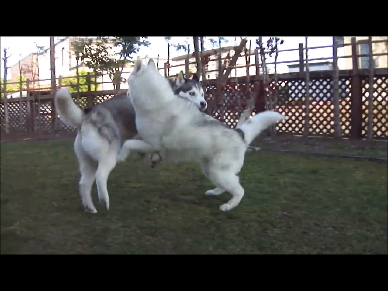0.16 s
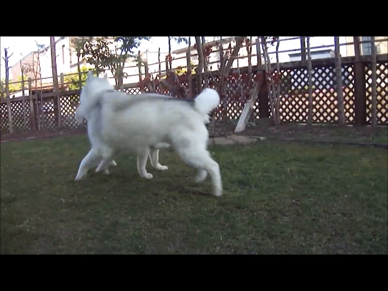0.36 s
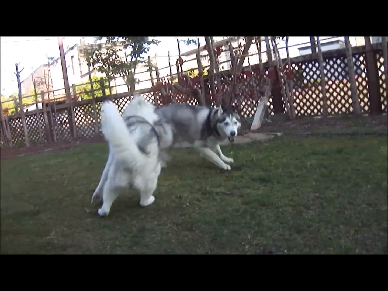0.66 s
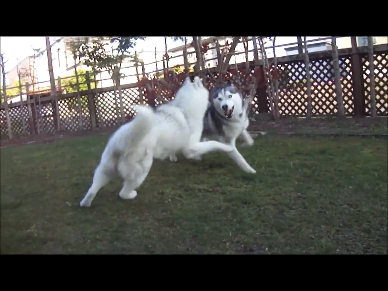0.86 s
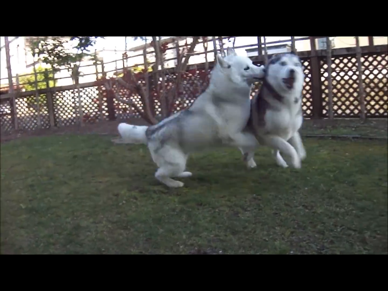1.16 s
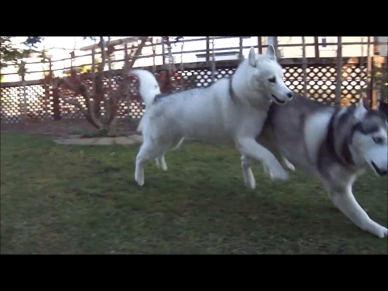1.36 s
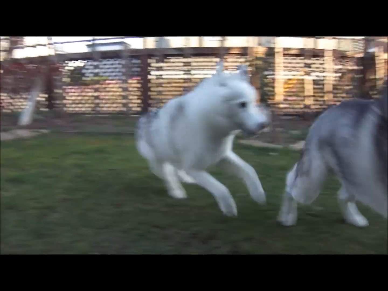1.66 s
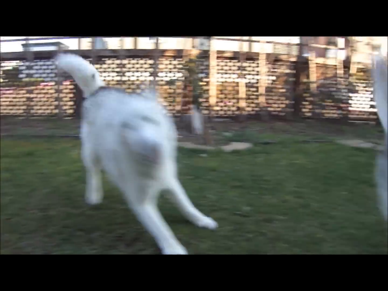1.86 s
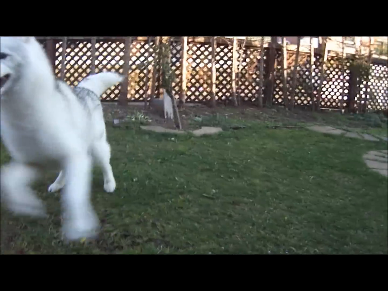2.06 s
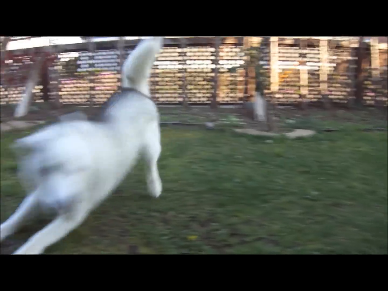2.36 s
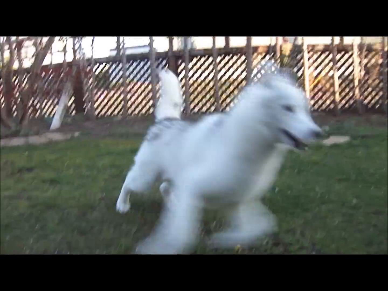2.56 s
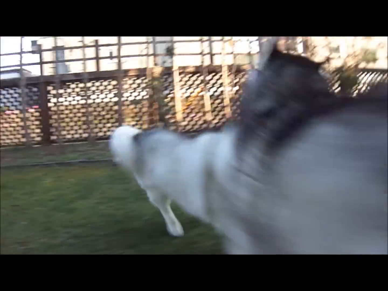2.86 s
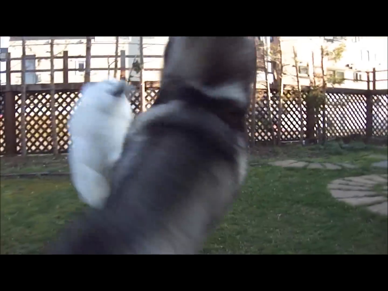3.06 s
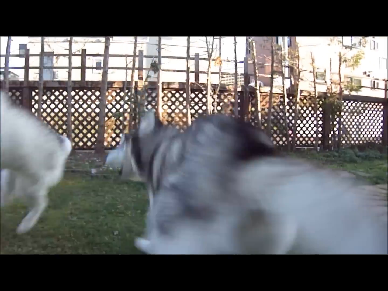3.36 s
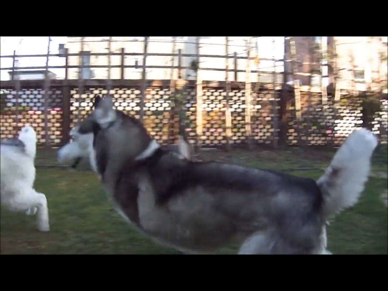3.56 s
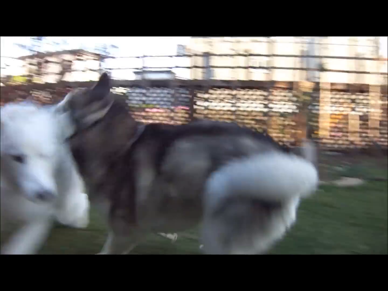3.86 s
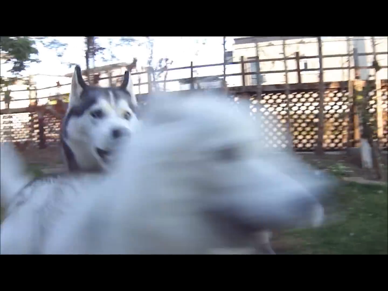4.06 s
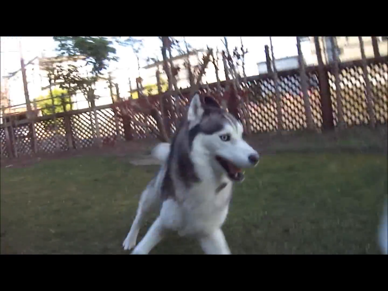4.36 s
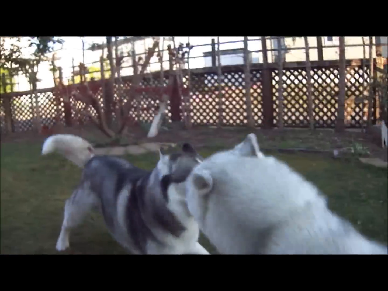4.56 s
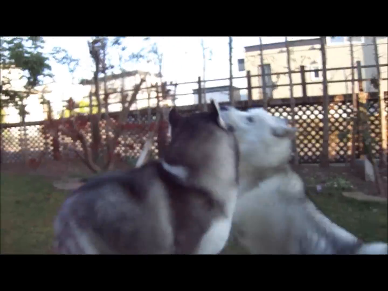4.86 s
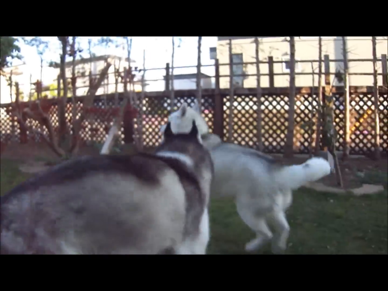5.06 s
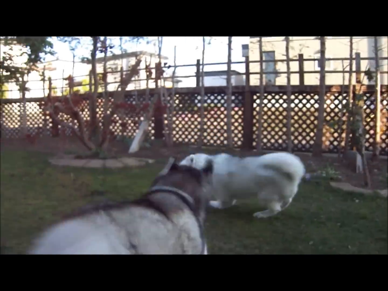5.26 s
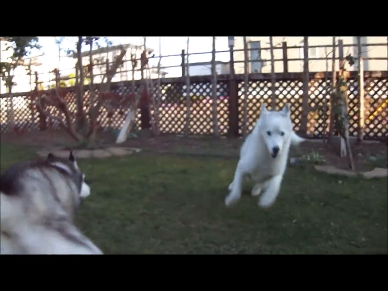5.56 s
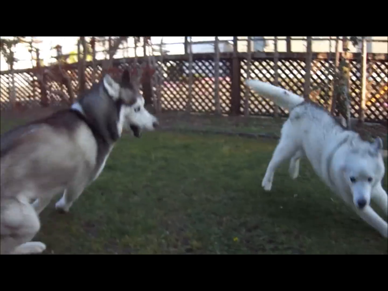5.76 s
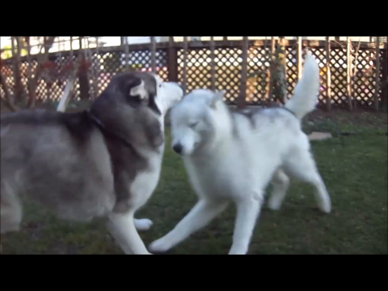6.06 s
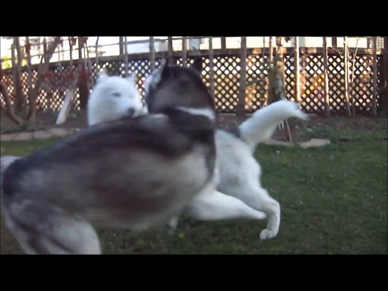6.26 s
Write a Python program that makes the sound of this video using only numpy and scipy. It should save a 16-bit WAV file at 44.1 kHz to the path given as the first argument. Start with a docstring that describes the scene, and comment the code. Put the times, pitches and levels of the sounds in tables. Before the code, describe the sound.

Two large dogs wrestle and chase close to a small camera microphone in an open garden. Soft huffs and a grumble come first over a faint fading engine hum, then a loud burst of yips, snarls and barks, quieter growls and pants, a hoarse yowl, and a last run of grunts, yelps and wheezes. Paws thump on turf, grass swishes and twigs snap.

```python
"""A garden lawn with a wooden fence: two dogs play-fight and chase each other close to the listener.
Rasping air through throat and jaw resonances makes huffs, pants and snarls; hoarse tones make the yips.
Every call swells to a crest and fades. Paws are decaying slaps and thuds, stalks crack in noise bursts,
and grass is a rain of coloured ticks. Ground and fence throw a little back as dull echoes.
Underneath lie the shaped noise of a distant town and, at first, the wavering hum of a far engine."""
import sys
import numpy as np
from scipy import signal
from scipy.io import wavfile
from scipy.ndimage import uniform_filter1d, map_coordinates

SR = 44100
rng = np.random.default_rng(int(sys.argv[2]) if len(sys.argv) > 2 else 0)


def transcribe(signal):
    """Save signal, clipped to [-1, 1], as a 16-bit WAV file at the path in sys.argv[1]."""
    frames = np.atleast_2d(signal).T
    limited = np.clip(frames, -1, 1)
    pcm = np.round(limited * 32767).astype(np.int16)
    wavfile.write(sys.argv[1], SR, pcm)


N = 283122
TIME = np.arange(N) / SR

# hush of the distant town, relative spectrum: [f/Hz, level/dB per Hz]
TOWN_SPECTRUM = [(30, -15), (60, -8), (140, -5.5), (350, 1.5), (600, 0), (1030, 4.5), (2400, -6),
                 (5000, -24), (11000, -23)]
# partials of the far engine, before its fade and wavering: [f/Hz, level/dB]
ENGINE_PARTIALS = [(102.3, -54.5), (150.7, -49.5)]
# rise and fall of the engine hum: [t/s, gain/dB]
ENGINE_FADE_CURVE = [(0, -8.5), (1.0, 1), (2.2, -18.5), (3.2, -29)]
# relative spectrum of rustling grass: [f/Hz, level/dB per Hz]
RUSTLE_SPECTRUM = [(500, 5.5), (1500, 2.5), (3000, 10), (5500, 5), (6800, 3.5), (11000, -5)]
# paws skidding through grass and fur brushing past: [start t/s, length t/s, level/dB]
GRASS_SWISHES = [(0.062, 0.057, -47.5), (0.19, 0.071, -51), (1.877, .13, -44.5), (2.737, 0.2, -46.5),
                 (3.905, .127, -40), (4.229, 0.15, -32), (5.84, .246, -41), (6.18, 0.17, -35.5)]
# echoes off ground and fence: [delay t/s, level/dB]
ECHOES = [(.009, -19.5), (.027, -18), (0.052, -27)]
# the dogs' calls; the moving jaw bends the mouth resonance:
# [start t/s, length t/s, crest level/dB, crest place 0-1, mouth resonance f/Hz, shape name]
CALLS = [(0.278, 0.25, -39, 0.35, 1060, "wheeze"), (0.624, 0.16, -30, 0.3, 1170, "pant"),
         (0.87, 0.062, -36.5, 0.74, 1360, "pant"), (1.141, 0.28, -29.5, 0.36, 900, "grumble"),
         (1.48, .16, -15, 0.54, 936, "yip"), (1.643, 0.089, -15, 0.51, 1056, "snarl"),
         (1.726, .08, -25, 0.24, 1000, "yelp"), (1.92, 0.16, -15.5, 0.12, 1156, "bark"),
         (2.129, 0.13, -29.5, 0.46, 1220, "pant"), (2.303, 0.12, -16, 0.31, 1170, "bark"),
         (2.415, 0.17, -14.5, 0.33, 1086, "screech"), (2.805, 0.09, -31.5, 0.34, 1020, "wheeze"),
         (2.887, 0.21, -22.5, .2, 1170, "growl"), (3.068, 0.15, -31, 0.28, 1064, "growl"),
         (3.395, 0.15, -30, 0.18, 1020, "pant"), (3.496, .165, -23, .55, 947, "yelp"),
         (3.659, .14, -27, 0.67, 1063, "wheeze"), (3.933, 0.091, -33.5, 0.42, 780, "pant"),
         (4.1, .1, -38, .45, 975, "grumble"), (4.242, .225, -15.5, .58, 1116, "yowl"),
         (4.46, 0.18, -25.5, 0.17, 1120, "wheeze"), (4.698, 0.079, -33, 0.14, 1200, "pant"),
         (4.81, .1, -22.5, .5, 970, "roar"), (4.993, 0.05, -30.5, 0.6, 1020, "wheeze"),
         (5.126, 0.32, -23.5, .72, 974, "wheeze"), (5.382, .1, -21.5, 0.4, 1100, "grunt"),
         (5.512, 0.19, -21, 0.34, 1008, "yelp"), (5.736, .22, -22, 0.73, 1100, "wheeze"),
         (5.939, 0.15, -15.5, 0.44, 986, "roar"), (6.206, 0.11, -31, 0.62, 1295, "grumble")]
# throat and mouth shapes by name, levels relative to the mouth resonance (throat() lifts the chest):
# [chest level/dB, pharynx f/Hz, pharynx level/dB, mouth width f/Hz,
#  muzzle f/Hz, muzzle level/dB, teeth f/Hz, teeth level/dB]
MOUTH_SHAPES = {"pant": (-10, 492, -9.5, 602, 1532, -12.5, 2364, -9),
                "grumble": (1.5, 576, -2.5, 273, 1446, -6.5, 2350, -13.5),
                "yip": (-17.5, 727, -17.5, 178, 1810.5, -11, 3298, -21.5),
                "snarl": (-16.5, 748, -7, 167, 1494, -8.5, 2409, -12),
                "bark": (-21.5, 624, -5, 497, 1789, -17, 2299, -17),
                "screech": (-18.5, 593, -19.5, 262, 1563, -11, 2555, -12),
                "growl": (0.5, 516, -6.5, 549, 2094, -5.5, 2484, -7),
                "yelp": (-13.5, 703, -11.5, 129, 1810, -10.5, 2580, -15.5),
                "yowl": (-18, 537, -11.5, 450, 1520, -14, 2368, -14),
                "wheeze": (-10, 654, -20, 489, 1814, -17, 2500, -15),
                "grunt": (4, 415, 15, 356, 1514, 5, 2600, -3),
                "roar": (-6, 527, -9, 219, 1635, -6, 2268, -7)}
# the vocal folds catch and squeal: [start t/s, end t/s, first pitch f/Hz, last pitch f/Hz, voiced share 0-1]
FOLD_SQUEALS = [(1.456, 1.63, 896, 988, 0.67), (2.44, 2.6, 1080, 1164, 0.16),
                (3.097, 3.152, 620, 681.4, 0.66), (3.713, 3.8, 1291, 1202, 0.69),
                (4.321, 4.53, 1019, 1292, 0.39), (5.546, 5.669, 682, 870, 0.5)]
# sudden jolts of air within the calls: [t/s, boost level/dB]
AIR_JOLTS = [(1.518, 5), (1.684, 1.5), (1.705, 7), (1.93, 7), (2.384, 0), (3.563, 8), (4.355, 7.5)]
# stalks and twigs snapping underfoot, before SNAP_GAIN_DB: [t/s, level/dB]
TWIG_SNAPS = [(0.5606, -33), (2.764, -26), (2.8734, -27), (3.729, -26.5), (4.0842, -40), (4.944, -40),
              (5.089, -34.5)]
# paws landing on the turf: [t/s, level/dB, slap pitch f/Hz]
PAW_LANDINGS = [(1.751, -13.5, 554), (1.787, -13, 490), (3.564, -11.5, 993), (3.857, -20, 680),
                (3.891, -21, 197), (4.013, -27.5, 220), (4.086, -25.5, 265), (4.635, -22.5, 207),
                (4.697, -14, 530), (4.944, -19, 1000), (4.98, -17, 745), (5.031, -21, 450),
                (5.447, -13.5, 657), (6.145, -15, 533), (6.173, -25.5, 220), (6.209, -16, 675),
                (6.282, -15, 705)]

TOWN_DB, SNAP_GAIN_DB = -42, -7.5
SWELL_DB = 18   # climb over a whole call length; an early crest takes only its share of it
FADE_DB, FADE_DB_PER_S = 7, 24   # drop from crest to end, plus more for each second the air has to last
FADE_CURVE = 1.285   # above 1, the push holds for a while before it gives way
ATTACK_S, RELEASE_S = 0.012, 0.02825   # the throat opens and shuts
JOLT_S = 0.0065
KNOCK = 5.5   # how hard each flap of the throat knocks, against the rush of air
CUTOFF_HZ = 11100   # top of the microphone's range


def from_db(db):
    """Decibels to gain."""
    return 10 ** (np.asarray(db) / 20)


def rms_one(x):
    """Scale to unit power."""
    return x / np.sqrt(np.mean(x ** 2) + 1e-20)


def in_time(rows):
    """Join curve rows by straight lines, one array per column."""
    s, *columns = np.transpose(rows)
    return [np.interp(TIME, s, c) for c in columns]


def drift(rate):
    """Smooth chance of spread 1 that changes about rate times a second."""
    # drawn at a tenth of the sample rate; the first 4000 values let the filter settle
    r = np.exp(-20 * np.pi * rate / SR)
    noise = rng.standard_normal(N // 10 + 4002)
    slow = signal.lfilter([1], [1, -2 * r, r * r], noise)[4000:]
    return np.interp(np.arange(N) / 10, np.arange(len(slow)), rms_one(slow))


def cut(x, hz, kind, order=2):
    """Low-, high- or band-pass."""
    return signal.sosfilt(signal.butter(order, hz, kind, fs=SR, output="sos"), x)


def resonance(x, hz, width_hz):
    """A peak filter run twice: steep skirts and gain 1 on top."""
    b, a = signal.iirpeak(hz, hz / width_hz, fs=SR)
    once = signal.lfilter(b, a, x + 1e-18)
    return signal.lfilter(b, a, once)


def coloured(source, spectrum):
    """Half-octave bands, neighbours fed by unrelated draws of source(), weighted by a spectrum; rms 1."""
    hz, db = np.transpose(spectrum)
    draws, out = [source(), source()], 0
    for k, low in enumerate(30 * 2 ** np.arange(0, 9, .5)):
        centre = low * 2 ** .25
        gain = from_db(np.interp(np.log(centre), np.log(hz), db))
        out = out + gain * cut(draws[k % 2], [low, low * np.sqrt(2)], "band")
    return rms_one(out)


def add(track, s, sound):
    """Mix a short sound in at time s."""
    at = max(round(s * SR), 0)
    track[at:at + len(sound)] += sound[:N - at]


def garden():
    """Shaped noise for the hush of the town; wavering sines for a far engine that swells, then fades."""
    hush = from_db(TOWN_DB) * coloured(lambda: rng.standard_normal(N), TOWN_SPECTRUM)
    turns = np.cumsum(1 + 0.0074 * drift(7.2)) / SR   # the engine speed wavers
    hum = 0
    for hz, db in ENGINE_PARTIALS:
        level = from_db(db + 2.7 * drift(7.9)) * np.sqrt(2)
        hum = hum + level * np.sin(2 * np.pi * hz * turns)
    fade_db, = in_time(ENGINE_FADE_CURVE)
    return hush + hum * from_db(fade_db)


def grass(blades_per_s, size_spread_db, swish, trample_db):
    """Countless blades tick over steady noise under restless feet; a skid raises them to a swish."""
    restless = from_db(3 * np.minimum(drift(12), 1.5))
    pressure = from_db(trample_db) * restless
    for start, length, db in GRASS_SWISHES:
        through = np.clip((TIME - start) / length, 0, 1)
        pressure = pressure + from_db(db) * np.sin(np.pi * through)
    clumps = from_db(2.0 * drift(67))
    struck = rng.random(N) < blades_per_s / SR
    ticks = struck * from_db(size_spread_db * np.minimum(rng.exponential(1, N), 4))
    rustle = coloured(lambda: (ticks + swish) * clumps * rng.standard_normal(N), RUSTLE_SPECTRUM)
    return pressure * rustle


def fence(x, dull_hz):
    """A few delayed copies, their treble softened: dull outdoor echoes."""
    dull = cut(x, dull_hz, "low", order=1)
    return sum(from_db(db) * np.interp(TIME - s, TIME, dull, left=0) for s, db in ECHOES)


def dogs():
    """Each call swells to its crest and is cut off; voicing shares it between rasping air and squeal."""
    air = rasping_air(flap_hz=95.7, jitter=.4, flap_decay_s=0.0065, steady=1.0, knock=KNOCK)
    tone, voiced = voicing()
    out = np.zeros(N)
    for start, length, crest_db, crest_at, mouth_hz, shape in CALLS:
        span = slice(round((start - RELEASE_S) * SR), round((start + length + RELEASE_S) * SR))
        t = TIME[span] - start
        opens = np.clip(t / ATTACK_S + .5, 0, 1)
        shuts = np.clip((length - t) / RELEASE_S + .5, 0, 1)
        effort = from_db(crest_db + effort_db(t, length, crest_at))
        opening = np.sqrt(effort / effort.max())      # the harder the push, the wider the jaw
        rasp = throat(air[span], mouth_hz, shape, hiss_db=-36)
        rasp = moving_jaw(rasp, opening, glide=0.27, closed_hz=2980)
        rasp = off_the_ground(rasp, bounce=0.68, path_s=0.002199, head_speed=0.0022)
        airy = np.sqrt(1 - voiced[span]) * rasp * even_gain(rasp)
        squealing = np.sqrt(voiced[span]) * tone[span]
        out[span] += opens * shuts * effort * (airy + squealing)
    throb = from_db(1.63 * drift(37.6))      # a snarl never flows evenly
    return cut(out * air_push() * throb, 146, "high", order=4)


def rasping_air(flap_hz, jitter, flap_decay_s, steady, knock):
    """Soft throat tissue flaps unevenly, chopping turbulent air into puffs that each start with a knock."""
    cycles = np.cumsum(flap_hz * np.exp(jitter * drift(50))) / SR
    flaps = np.diff(np.floor(cycles), prepend=0) * from_db(5.7 * drift(94))   # one impulse per cycle
    puffs = signal.lfilter([1], [1, -np.exp(-1 / (flap_decay_s * SR))], flaps)
    return rng.standard_normal(N) * (steady + puffs) + knock * flaps


def voicing():
    """The folds' gliding squeal, and the share of each moment's power that it takes from the air."""
    points = []
    voiced = np.zeros(N)
    for start, end, first, last, share in FOLD_SQUEALS:
        points += [(start, first), (end, last)]
        add(voiced, start, share * signal.windows.tukey(round((end - start) * SR), .5))
    pitch, = in_time(points)
    return squeal(pitch, jitter=0.03065, shimmer_db=2.0), voiced


def squeal(pitch, jitter, shimmer_db):
    """A hoarse, shaking tone with a strong fundamental and weak overtones."""
    phase = 2 * np.pi * np.cumsum(pitch * (1 + jitter * drift(167.3))) / SR
    partials_db = [0.5, -17.5, -32, -33]
    tone = sum(from_db(db) * np.sin(k * phase) for k, db in enumerate(partials_db, 1))
    tone = tone * from_db(shimmer_db * drift(180))
    return tone * even_gain(tone)


def even_gain(x):
    """Gain that holds the mid-range power at 1 while sparing the single puffs."""
    size = SR // 70   # smoothing window, about 14 ms, run twice
    power = cut(x, [500, 3500], "band") ** 2
    return 1 / np.sqrt(uniform_filter1d(uniform_filter1d(power, size), size) + 1e-9)


def effort_db(t, length, crest_at):
    """Level below the crest, t seconds into a call: the push swells, holds, then the air runs out."""
    through = np.clip(t / length, 0, 1)
    to_come = np.maximum(crest_at - through, 0)
    spent = np.maximum(through - crest_at, 0) / (1 - crest_at)
    final_drop_db = FADE_DB + FADE_DB_PER_S * length * (1 - crest_at)
    return -SWELL_DB * to_come - final_drop_db * spent ** FADE_CURVE


def throat(flow, mouth_hz, shape, hiss_db):
    """Chest, pharynx, mouth, muzzle and teeth resonate side by side; some air hisses straight out."""
    (chest_db, pharynx_hz, pharynx_db, mouth_width_hz,
     muzzle_hz, muzzle_db, teeth_hz, teeth_db) = MOUTH_SHAPES[shape]
    # (f/Hz, width/Hz of each filter pass, level/dB); the last two are fixed upper resonances
    tract = [(175, 150, chest_db + 1.5), (pharynx_hz, 480, pharynx_db), (mouth_hz, mouth_width_hz, 0),
             (muzzle_hz, 600, muzzle_db), (teeth_hz, 700, teeth_db),
             (3230, 550, teeth_db - 9.5), (4250, 700, -26)]
    voice = 0
    for k, (hz, width_hz, db) in enumerate(tract):
        arriving = np.roll(flow, k * SR // 1500)   # air reaches each cavity a moment after the one before
        voice = voice + from_db(db) * resonance(arriving, hz, width_hz)
    return voice + from_db(hiss_db) * cut(flow, [4000, 7500], "band", order=1)


def moving_jaw(x, opening, glide, closed_hz):
    """As the jaw opens every resonance slides up; half closed, the lips dull the sound."""
    reading = np.cumsum(1 + glide * (opening - opening.mean()))   # varying playback speed
    slid = map_coordinates(x, [reading], order=3, mode="mirror")
    return opening * slid + (1 - opening) * cut(slid, closed_hz, "low", order=1)


def off_the_ground(x, bounce, path_s, head_speed):
    """The ground returns the voice a moment later; the moving head sweeps the notches."""
    t = TIME[:len(x)]
    head = head_speed * rng.choice([-1, 1]) * (t - t.mean())   # towards the ground or away from it
    delay = path_s * rng.uniform(0.484, 1.49) + head
    return x + bounce * map_coordinates(x, [(t - delay) * SR], order=3)


def air_push():
    """Breath gain of 1 with brief jolts on top."""
    push = np.ones(N)
    for s, db in AIR_JOLTS:
        add(push, s, (from_db(db) - 1) * signal.windows.tukey(round(JOLT_S * SR), .5))
    return push


def snaps(decay_s):
    """A stalk breaks in a short, bright crack: band-passed noise that dies at once."""
    out, t = np.zeros(N), TIME[:SR // 20]
    for s, db in TWIG_SNAPS:
        crack = rms_one(cut(rng.standard_normal(len(t)), [800, 7000], "band", order=1))
        add(out, s, from_db(db + SNAP_GAIN_DB) * crack * np.exp(-t / decay_s))
    return out


def paws(slap_cycles, turf_hz, turf_db, turf_decay_s, scuff_db, scuff_decay_s):
    """A pad slaps for a cycle or two, the turf thuds under it and the grass is scuffed."""
    out, t = np.zeros(N), TIME[:SR // 8]
    for s, db, hz in PAW_LANDINGS:
        swell = hz * t / slap_cycles
        slap = np.sin(2 * np.pi * hz * t) * swell * np.exp(1 - swell)
        thud = rms_one(resonance(rng.standard_normal(len(t)), turf_hz, 175)) * np.exp(-t / turf_decay_s)
        scuff = rms_one(cut(rng.standard_normal(len(t)), 800, "low", order=1))
        scuff = scuff * np.exp(-t / scuff_decay_s)
        add(out, s, from_db(db) * (slap + from_db(turf_db) * thud + from_db(scuff_db) * scuff))
    return cut(out, 143, "high")


def scene():
    """Dogs, feet and grass in the open garden."""
    lawn = grass(blades_per_s=1300, size_spread_db=6.5, swish=1.0, trample_db=-53.5)
    feet = paws(slap_cycles=0.48, turf_hz=170, turf_db=-18.5, turf_decay_s=0.014,
                scuff_db=-17.5, scuff_decay_s=0.023)
    play = lawn + dogs() + snaps(decay_s=0.0089) + feet
    return (garden() + play + fence(play, dull_hz=3030))[None]


def record(dry):
    """A small camera microphone: thin bass, rounded peaks, no top."""
    rounded = 1.2 * np.tanh(cut(dry, 55, "high") / 1.2)
    return signal.sosfilt(signal.ellip(14, .2, 80, CUTOFF_HZ, fs=SR, output="sos"), rounded)


dry = scene()
out = record(dry)
transcribe(out)
```